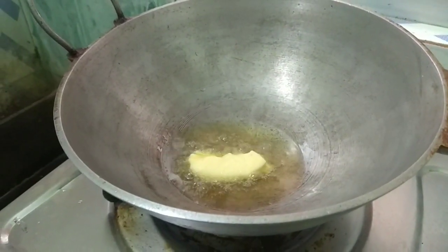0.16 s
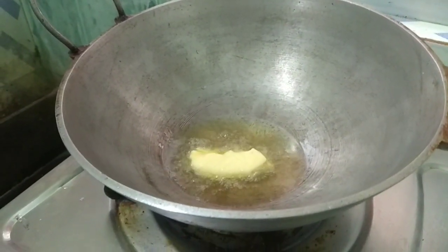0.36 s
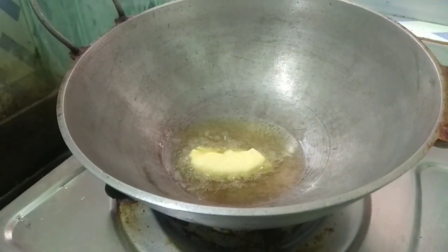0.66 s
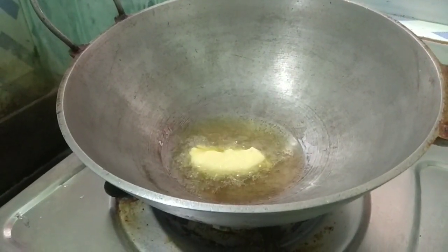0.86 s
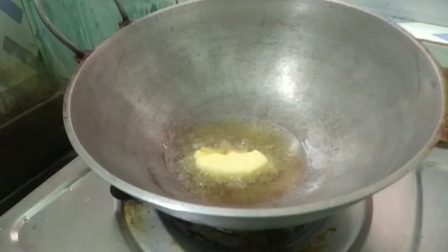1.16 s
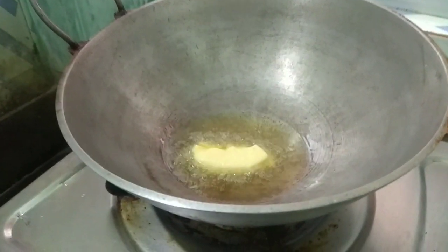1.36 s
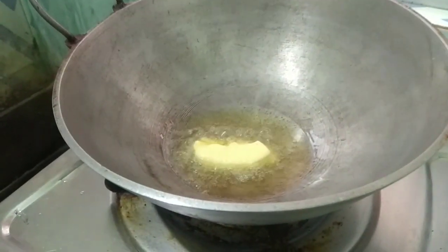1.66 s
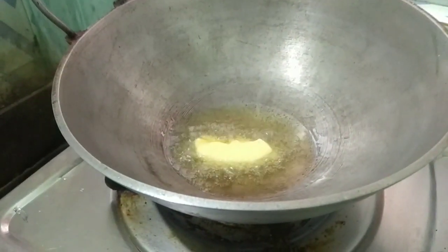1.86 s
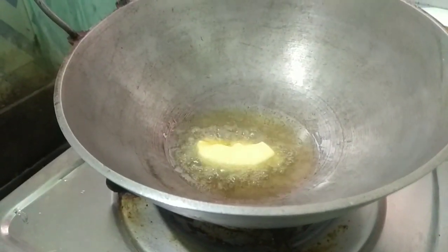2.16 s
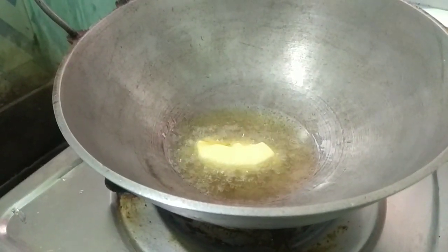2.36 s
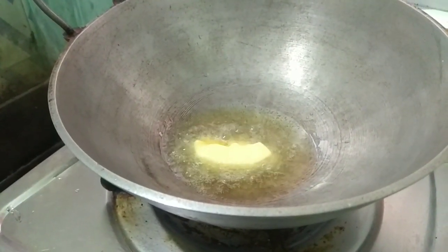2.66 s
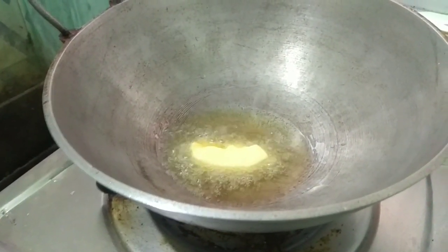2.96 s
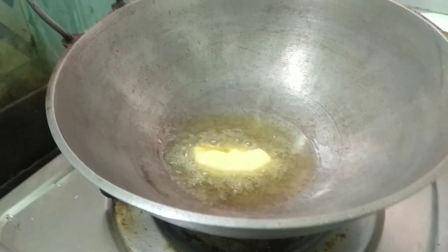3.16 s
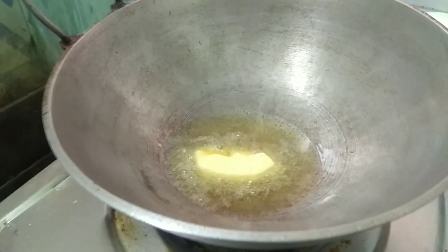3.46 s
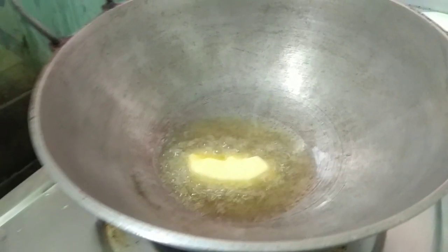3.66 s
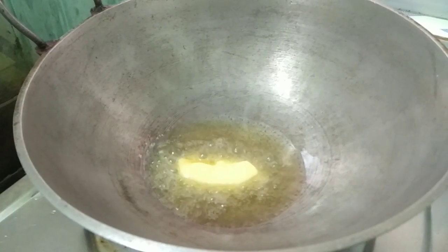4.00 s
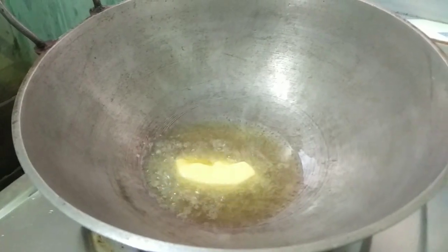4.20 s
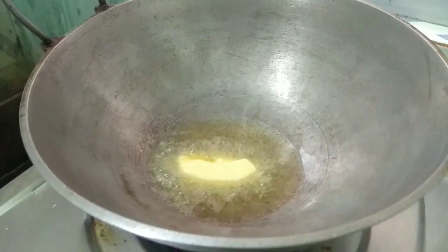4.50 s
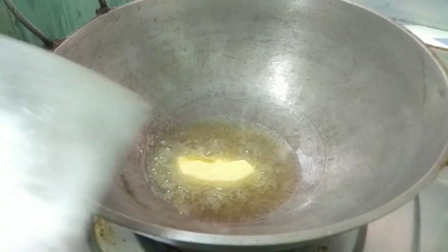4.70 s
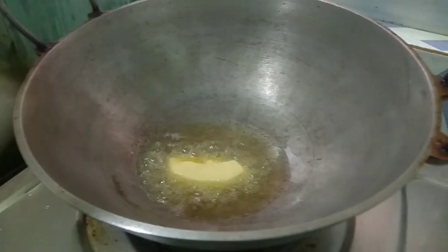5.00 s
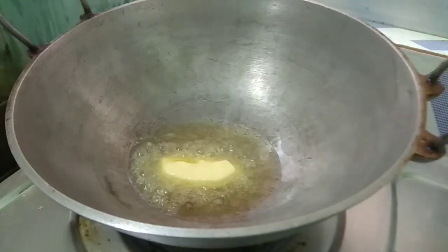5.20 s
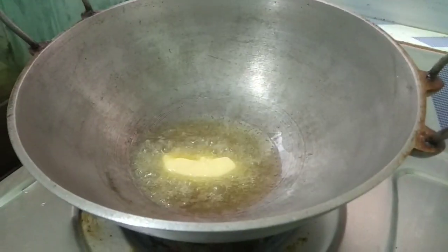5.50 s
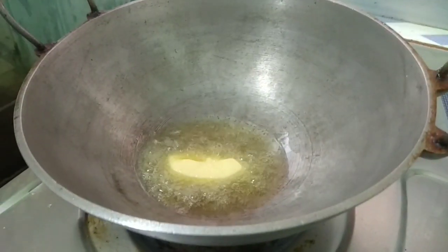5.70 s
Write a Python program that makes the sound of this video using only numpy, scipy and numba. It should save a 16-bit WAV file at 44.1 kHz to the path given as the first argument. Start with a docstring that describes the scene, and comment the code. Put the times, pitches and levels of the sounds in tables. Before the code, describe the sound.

Butter frying in hot oil in a thin metal wok on a stove. Sharp steam pops with short sprays of spatter come thick and loud in the first second and a half, then thin out. Foamy sizzling rushes surge in the middle, followed by a lighter simmer with scattered snaps. Close handheld phone microphone, narrow band, with very faint room hiss.

```python
"""Butter melts in hot oil in a metal wok: steam pops crack at a bubble's pitch and spit a patter of spray.
Random clicks through resonant bands make the sizzle of large and small bubbles and the foam's soft rushes.
Bright snaps, rough squeals and soft narrow noise swells join in; the bowl rings at its modes over faint
kitchen hiss. A tone colour, a phone's noise suppressor and its narrow band shape the whole."""
import sys
import numpy as np
from scipy import signal
from scipy.fft import rfft, irfft
from scipy.io import wavfile
from scipy.ndimage import uniform_filter1d
from numba import njit

SR = 44100
rng = np.random.default_rng(int(sys.argv[2]) if len(sys.argv) > 2 else 0)


def persist_wave(psi):
    """Save psi, clipped to +-1, as 16-bit WAV."""
    counts = np.round(np.clip(psi, -1, 1) * 32767).astype(np.int16)
    wavfile.write(sys.argv[1], SR, np.atleast_2d(counts).T)


N = 257832  # length in samples


def undb(db):
    """Gain of a level in dB."""
    return 10 ** (np.asarray(db) / 20)


def unit(x):
    """Scale to rms 1."""
    return x / np.sqrt(np.mean(x ** 2))


@njit
def sweep(x, g, k):
    """State-variable band-pass, gain 1 at the centre; g sets the centre and k the relative width."""
    y, band, low = np.empty(len(x)), 0., 0.
    for i in range(len(x)):
        v = (band + g[i] * (x[i] - low)) / (1 + g[i] * (g[i] + k[i]))
        band = 2 * v - band
        low = low + 2 * g[i] * v
        y[i] = k[i] * v
    return y


def svf(x, hz, width):
    """Band-pass at a fixed or moving centre; equal first and last centres count as fixed."""
    hz = hz + np.zeros(len(x))
    if hz[0] == hz[-1]:
        g = np.full(len(x), np.tan(np.pi * hz[0] / SR))
    else:
        g = np.tan(np.pi * hz / SR)
    return sweep(1. * x, g, width / hz)


def ring(x, hz, width):
    """A steep resonance: the band-pass twice."""
    width = np.maximum(width, 20.)
    return svf(svf(x, hz, width), hz, width)


def colour(x, points):
    """Shape a spectrum by (Hz, dB) points, joined along log frequency."""
    hz, db = np.transpose(points)
    f = np.maximum(np.arange(N // 2 + 1) * SR / N, 1)
    gain = undb(np.interp(np.log(f), np.log(hz), db))
    return irfft(rfft(x) * gain, N)


def walk(rate):
    """Random levels held 1 / rate s and slewed twice; rms 1."""
    k = int(SR / rate)
    steps = np.repeat(rng.standard_normal(N // k + 1), k)
    return unit(uniform_filter1d(uniform_filter1d(steps, k), k)[:N])


def crackle(rate, spread_db, hiss_db):
    """Bursting bubbles: random clicks (rate per second), some larger than the rest, over hiss."""
    when, sign, size = rng.random(N), rng.random(N), rng.exponential(1, N)
    size = np.minimum(size, 3.5)
    clicks = (when < rate / SR) * np.sign(sign - .5) * undb(spread_db * size)
    return unit(unit(clicks) + undb(hiss_db) * rng.standard_normal(N))


# Steam pops. Each row: start in seconds, crack level in dB, pitch in Hz,
# spray decay by 60 dB in seconds, spray level in dB against the crack.
STEAM_POPS = [(0.06, -20, 3500, 0.36, -10), (0.0685, -14.5, 3275, 0.25, -10), (0.147, -26, 5850, 0.22, -10),
              (0.173, -9, 5960, 0.21, -9), (0.1861, -16, 4080, 0.21, -3.5), (0.268, -33, 6090, 0.94, -2),
              (0.25, -37, 3260, 0.52, 1.5), (0.3207, -25, 3350, 0.14, -6.5), (0.333, -20, 3940, 0.24, -8.5),
              (0.361, -3.5, 6090, 0.2, -13), (0.3643, -15, 3940, 0.16, -11), (0.4856, -14.5, 4170, .15, -7),
              (0.4876, -12.5, 5790, 0.27, -12), (0.515, -20, 5280, 0.22, -0.5),
              (0.6477, -28, 3380, 0.17, -8), (0.701, -36.5, 5990, 0.33, -6.5),
              (0.746, -20.5, 4280, 0.53, -7), (0.7841, -20.5, 3750, 0.24, -5),
              (0.8096, -11.5, 5860, 0.14, -9), (0.82, -17, 5900, 0.2, -6), (0.9562, -20, 5870, 0.32, -5),
              (0.96, -30.5, 3350, 0.49, -3.5), (1.0208, -28.5, 6140, 0.18, -6),
              (1.0555, -26, 5950, .09, -12), (1.0649, -28.5, 5900, .1, -9), (1.16, -44.5, 3030, .2, -0.5),
              (1.2138, -22.5, 3790, 0.42, -8), (1.2249, -19, 5800, 0.21, -13),
              (1.288, -28, 3425, 0.27, -12), (1.3925, -20, 2860, 0.23, -4.5), (1.4, -18.5, 3770, .12, -10),
              (1.45, -9.5, 3870, 0.079, -14), (1.458, -19.5, 3890, .17, -1.5),
              (1.538, -22, 5870, 0.14, -7.5), (1.6239, -31, 5810, 0.43, -9), (1.6372, -20, 4255, 0.3, -8.5),
              (1.677, -22, 3870, 0.067, -14), (1.6824, -26, 3240, 0.25, -4.5),
              (1.7217, -29.5, 5990, 0.12, -2.5), (1.8716, -29.5, 6290, 0.28, -7),
              (2.063, -27.5, 5800, .3, -7.5), (2.063, -30, 3710, .3, -7), (2.149, -22, 5730, 0.2, -14.5),
              (2.168, -34, 3130, 0.18, -6), (2.2415, -20.5, 5850, 0.24, -15.5),
              (2.3146, -26, 6040, 0.22, -8), (2.4069, -24, 4180, 0.3, -9.5), (2.451, -21, 6110, 0.26, -7.5),
              (2.7165, -31, 5220, 0.15, -5), (2.79, -36, 2400, 0.28, -2.5), (2.802, -28.5, 6340, 0.36, -5),
              (2.8631, -30.5, 3520, .31, -5.5), (2.8907, -21.5, 3344, 0.25, -3.5),
              (2.925, -16.5, 3164, 0.32, -11), (3.019, -31, 3570, 0.21, -4.5),
              (3.1094, -39, 6050, 0.47, -8.5), (3.2436, -21.5, 6320, 0.53, -10),
              (3.2971, -15, 6520, 0.14, -11), (3.374, -29, 5500, 0.39, -6), (3.4436, -35.5, 3995, 0.31, 0),
              (3.714, -38, 3150, 0.5, -1.5), (3.874, -35, 3630, .59, -6), (3.9696, -29.5, 6130, 0.09, -4),
              (4.002, -15.5, 6390, 0.19, -7.5), (4.1815, -27.5, 5490, 0.13, -9),
              (4.179, -32.5, 3440, 0.14, -3.5), (4.2636, -38.5, 3170, 0.28, -3),
              (4.2832, -27.5, 2933, 0.12, -9), (4.3589, -28.5, 5430, 0.28, -10),
              (5.018, -26, 3760, 0.13, -14), (5.032, -27.5, 3640, 0.097, -11.5),
              (5.1798, -33.5, 5900, 0.47, -6), (5.213, -31.5, 6570, 0.14, -5),
              (5.376, -30.5, 4990, 0.2, -8), (5.4408, -28.5, 3765, 0.22, -7.5),
              (5.458, -24.5, 6170, 0.28, -7.5), (5.4799, -12, 5340, .05, -20), (5.487, -25, 5130, .3, -4),
              (5.5755, -29.5, 5990, 0.063, -4.5), (5.697, -28.5, 6040, .24, -6),
              (5.767, -37, 3030, 0.24, 1), (5.7834, -17, 3000, .25, -13.5)]
WOK_LOW_HZ, WOK_HIGH_HZ, SPRAY_WIDTH_HZ = 3870, 5900, 1400
OTHER_LOW_DB, OTHER_HIGH_DB = -11.5, -15.5  # the wok's other ringing band: under a high pop, under a low pop
THUMP_HZ, THUMP_WIDTH_HZ = 900, 3200  # dull push under a crack
THUMP_DB, THUMP_GROWTH = -25.5, 2.9  # offset in dB; dB gained per dB of crack


def pops():
    """Water flashes to steam: a crack at the bubble's pitch, then droplets that patter back and die away."""
    out, low, t = np.zeros(N + SR), np.zeros(N + SR), np.arange(SR // 3) / SR
    thump = ring(np.exp(-t / 0.00097), THUMP_HZ, THUMP_WIDTH_HZ)
    thump = thump / np.abs(thump).max()
    spray = crackle(rate=1100, spread_db=1.2, hiss_db=-9)
    starts = rng.integers(0, N - len(t), len(STEAM_POPS))
    for (s, db, hz, t60, spray_db), a in zip(STEAM_POPS, starts):
        crack = np.sin(2 * np.pi * hz * t) * (t / 0.0011) * np.exp(1 - t / 0.00077)
        crack[:4] += 1.2 * np.array([1, -1, -1, 1])  # the film snaps
        if hz > 4700:
            other_hz, other_db = WOK_LOW_HZ, OTHER_LOW_DB
        else:
            other_hz, other_db = WOK_HIGH_HZ, OTHER_HIGH_DB
        drops = spray[a:a + len(t)]
        patter = unit(ring(drops, hz, SPRAY_WIDTH_HZ))
        patter = patter + undb(other_db) * unit(ring(drops, other_hz, SPRAY_WIDTH_HZ))
        onset = (1 - np.exp(-t / 0.0023)) ** 2
        patter = patter * onset * undb(spray_db - 60 * t / max(t60, .03))
        i = int(s * SR)
        out[i:i + len(t)] += undb(db) * (crack + patter)
        low[i:i + len(t)] += undb(THUMP_GROWTH * db + THUMP_DB) * thump
    return out[:N], low[:N]


# Lone droplets that snap without a spray. Each row: start in seconds, peak level in dB.
DROPLET_SNAPS = [(0.1763, -17), (0.1768, -13.5), (0.366, -11.5), (0.3685, -13.5), (1.8827, -26),
                 (1.9161, -33), (2.0626, -25), (2.9303, -21), (3.383, -30.5), (3.452, -30), (4.056, -26),
                 (4.4015, -25.5), (4.861, -32), (5.032, -22.5), (5.0458, -29.5), (5.1751, -25),
                 (5.215, -24.5), (5.24, -22.5), (5.185, -29.5), (5.3128, -35), (5.376, -22),
                 (5.4437, -25.5)]
TICK_HZ, TICK_WIDTH_HZ = 5600, 4200  # band of a snap
PATTER_DB = -5.5  # scattered snaps against the small bubbles' gain


def ticks(gain):
    """Short bright snaps: the loud ones from the table, the faint ones scattered with the boiling."""
    snap = ring(np.arange(200) == 0., TICK_HZ, TICK_WIDTH_HZ)
    clicks = np.zeros(N)
    for s, db in DROPLET_SNAPS:
        clicks[int(s * SR)] = undb(db)
    loud = np.convolve(clicks, snap)[:N] / np.abs(snap).max()
    scattered = unit(np.convolve(crackle(rate=300, spread_db=3.0, hiss_db=-30), snap)[:N])
    return loud + undb(PATTER_DB) * gain * scattered


FLICKER_DB = 1.5  # rms level flicker of a bubble size
WANDER = .12  # rms pitch drift of a bubble size, share of its width


def bubbles(sizes, rate, spread_db, hiss_db):
    """Each bubble size crackles on its own, flickers in level and wanders in pitch; one row per size."""
    rows = []
    for hz, width, db in sizes:
        flicker = undb(db + FLICKER_DB * walk(26.04))
        pitch = hz + WANDER * width * walk(20)
        rows.append(flicker * unit(ring(crackle(rate, spread_db, hiss_db), pitch, width)))
    rows = np.array(rows)
    return rows / np.sqrt(np.mean(rows.sum(axis=0) ** 2))


# Surges of boiling. Each row: top in seconds, fall by 20 dB in seconds (0.02 at least),
# then the levels in dB of large bubbles, small bubbles and foam rush.
BOILING_SURGES = [(0.194, 0.09, -38.5, -38, -51.5), (0.545, 0.34, -46.5, -44.5, -52),
                  (1.47, 0.1637, -35.5, -38.5, -61.5), (1.69, 0.08, -37.5, -51.5, -55.5),
                  (1.968, 0.13, -39.5, -49, -56), (2.12, 0.0818, -36.5, -35, -38),
                  (2.189, 0.0842, -35, -37, -49.5), (2.5, 0.0856, -32.5, -31.5, -33),
                  (2.82, 0.2, -51.5, -46, -50), (2.905, 0.0843, -32, -30, -30.5),
                  (3.16, 0.4, -49.5, -55.5, -60.5), (3.229, 0.16, -45, -41, -51),
                  (3.296, 0.0783, -38, -33.5, -36.5), (3.589, 0.13, -55, -47, -54),
                  (3.755, 0.12, -46, -48.5, -51), (4.039, 0.13, -41, -40.5, -46), (4.3, 0.5, -49, -59, -73),
                  (4.43, 1.16, -62.5, -49.5, -71.5), (4.56, -0.04, -45.5, -49.5, -74.5),
                  (4.818, 0.06, -43, -51.5, -58), (4.92, 0.5, -48.5, -56.5, -62.5),
                  (5.056, 0.05, -40.5, -41, -58), (5.292, 0.3, -46.5, -52, -64),
                  (5.421, 0.23, -39.5, -42.5, -61.5), (5.55, 0.7, -49, -48, -59.5),
                  (5.72, -0.13, -52.5, -47.5, -66.5)]
SURGE_RISE, SURGE_SHAPE = 0.9, 1.555  # rise time against fall time; power of the fall in dB (flat top, steep flanks)


def boiling(column, simmer_db, stretch=1):
    """Gain of one bubble layer: the simmer, and surges that swell, hold briefly and fade, summed in power."""
    t = np.arange(N) / SR
    coarse = t[::32]
    power = undb(np.broadcast_to(simmer_db, N)[::32]) ** 2
    for row in BOILING_SURGES:
        since = (coarse - row[0]) / max(row[1], .02) / stretch
        drop_db = 20 * np.maximum(since, -since / SURGE_RISE) ** SURGE_SHAPE
        power = power + undb(row[column] - drop_db) ** 2
    return np.interp(t, coarse, np.sqrt(power))


# Bubble sizes of the sizzle and the foam. Each row: pitch in Hz, filter width in Hz, relative level in dB.
LARGE_BUBBLES = [(2276, 440, -2), (2845, 360, -2), (3550, 1380, 8)]
SMALL_BUBBLES = [(4476, 260, -9), (5695, 2350, 1.5), (6810, 190, -7)]
FOAM_BUBBLES = [(755, 49, -11.5), (1130, 880, 0), (1610, 720, 3.5), (2400, 1730, 6.5)]
# Simmer between the surges. Each row: time in seconds, large bubbles in dB, small bubbles in dB.
SIMMER_LEVELS = [(0, -48.5, -55.5), (.04, -54, -58), (.7, -47.5, -51), (1.14, -61, -69.5),
                 (1.2, -51.5, -67), (1.36, -52, -67.5), (1.6, -56.5, -51), (1.81, -63, -66.5),
                 (1.86, -65, -64), (1.89, -61.5, -48.5), (2.38, -47.5, -50.5), (2.72, -45.5, -49.5),
                 (3.095, -54.5, -62), (3.5, -43.5, -51), (3.66, -50, -55.5), (3.9, -51, -51),
                 (4.6, -49.5, -53.5), (4.72, -49, -60), (5.12, -52.5, -50), (5.85, -49, -57.5)]
SIMMER_FOAM_DB = -70.5
FOAM_NARROW = .3  # low foam comes and goes faster than high: power of pitch in its surge length
SIZZLE_LOW_HZ = 2400  # steep lower edge of the sizzle and pops


def frying():
    """The sizzle of large and small bubbles with the pops, and under it the surging foam."""
    cracks, thumps = pops()
    s, large_db, small_db = np.transpose(SIMMER_LEVELS)
    t = np.arange(N) / SR
    large = boiling(column=2, simmer_db=np.interp(t, s, large_db))
    small = boiling(column=3, simmer_db=np.interp(t, s, small_db))
    sizzle = large * bubbles(LARGE_BUBBLES, rate=1200, spread_db=1.5, hiss_db=-6.0).sum(axis=0)
    sizzle = sizzle + small * bubbles(SMALL_BUBBLES, rate=1100, spread_db=3.5, hiss_db=-6).sum(axis=0)
    sizzle = sizzle + ticks(small) + cracks
    edge = signal.butter(N=6, Wn=SIZZLE_LOW_HZ, btype="high", fs=SR, output="sos")
    foam = np.zeros(N)
    rows = bubbles(FOAM_BUBBLES, rate=600, spread_db=1.0, hiss_db=-12.5)
    for (hz, _, _), row in zip(FOAM_BUBBLES, rows):
        stretch = (hz / FOAM_BUBBLES[-1][0]) ** FOAM_NARROW
        foam += boiling(column=4, simmer_db=SIMMER_FOAM_DB, stretch=stretch) * row
    return signal.sosfilt(edge, sizzle) + foam + thumps


# Ringing of the bowl. Each row: mode in Hz, level in dB before wok() compresses the differences.
WOK_MODES = [(1308, -55.5), (1766, -45.5), (2028, -55), (2460, -65), (3402, -66.5), (3768, -48),
             (4086, -68), (4285, -65.5), (5534, -58), (6045, -49), (6422, -64), (6708, -45)]


def wok(x, width_hz, ring_db):
    """The thin bowl rings along at its modes, the strongest at ring_db."""
    top_db = max(db for _, db in WOK_MODES)
    ringing = sum(undb(ring_db + 0.42 * (db - top_db)) * svf(x, float(hz), width_hz) for hz, db in WOK_MODES)
    return x + ringing


def flutter(x):
    """A faint low flutter: a wavering noise band that rises with the frying."""
    effort = np.sqrt(uniform_filter1d(x ** 2, int(0.017 * SR)) + 1e-12)
    waver = undb(3.0 * walk(12))
    rumble = ring(rng.standard_normal(N), 210.0, 890.0)
    return undb(-70.0) * unit(effort ** 0.56 * rumble * waver)


# Squeals of steam forced through the fat, one curve each. Each row: time in seconds, pitch in Hz, level in dB.
SQUEAL_CURVES = [
    [(0.41, 1797, -63), (0.46, 1880, -53), (0.53, 1974, -50.5), (0.585, 1884, -48.5), (0.65, 1793, -50.5),
     (0.72, 1800, -64.5)],
    [(0.535, 2610, -56), (0.555, 2400, -45), (0.58, 2230, -51.5)],
    [(3.97, 1730, -58), (3.99, 1804, -49.5), (4.075, 1940, -42), (4.16, 1880, -47), (4.25, 1700, -60.5)],
]
# Filter width of each squeal, in Hz.
SQUEAL_BANDS = [220, 240, 560]


def squeals():
    """Steam forced through the fat: a narrow rough band that bends in pitch."""
    out, t, air = np.zeros(N), np.arange(N) / SR, crackle(rate=600, spread_db=1.0, hiss_db=4.0)
    for curve, width in zip(SQUEAL_CURVES, SQUEAL_BANDS):
        s, hz, db = np.transpose(curve)
        near = slice(int(s[0] * SR), int(s[-1] * SR))
        tone = unit(ring(air[near], np.interp(t[near], s, hz), width))
        level = undb(np.interp(t[near], s, db))
        out[near] += tone * level * signal.windows.tukey(len(tone), .2)
    return out


# Soft narrow noise swells, from low to high pitch.
# Each row: top in seconds, pitch in Hz, length in seconds, level in dB.
NOISE_SWELLS = [(0.171, 372, 0.13, -63), (0.238, 956, 0.099, -57), (0.563, 573, 0.11, -57),
                (1.243, 648, .067, -59), (1.462, 2515, 0.14, -39.5), (1.487, 1160, 0.17, -63.5),
                (1.672, 742, 0.082, -59), (1.961, 474, 0.099, -58.5), (1.345, 2796, .05, -40.5),
                (2.075, 1606, .05, -50.5), (2.636, 2950, .05, -42), (3.312, 1016, .07, -48.5),
                (2.82, 2163, 0.065, -45), (3.136, 2035, 0.045, -50.5), (2.916, 454, .15, -51),
                (3.238, 367, 0.34, -64), (3.586, 1706, 0.056, -59.5), (4.03, 466, 0.06, -53.5),
                (4.08, 967, 0.07, -56.5), (4.79, 900, 0.12, -64), (4.82, 3700, .07, -42.5),
                (4.92, 2793, .05, -48.5), (5.062, 571, 0.051, -58.5)]


def noise_swells():
    """Soft narrow bands of rough noise, from low to high pitch; each swells and fades."""
    out, t, air = np.zeros(N), np.arange(N) / SR, crackle(rate=360, spread_db=0.5, hiss_db=9.0)
    for s, hz, length, db in NOISE_SWELLS:
        near = slice(max(int((s - 2 * length) * SR), 0), int((s + 2 * length) * SR))
        tone = unit(ring(air[near], hz, hz / 7))
        swell = np.exp(-(2 * (t[near] - s) / length) ** 2)
        out[near] += undb(db) * tone * swell
    return out


# Colour of the room hiss. Each row: frequency in Hz, relative gain in dB.
KITCHEN_COLOUR = [(25, -32), (49, -36.5), (118, -14.5), (225, -13.5), (479, -7), (1760, -12.5), (2230, -4),
                  (2600, -10), (3380, -24), (5720, -120)]
KITCHEN_DB = -60


def kitchen():
    """Faint room hiss; octave bands of noise waver apart."""
    bands = np.zeros(N)
    for hz in 47.0 * 2 ** np.arange(8):
        bands += undb(1.5 * walk(10)) * svf(rng.standard_normal(N), hz, 0.84 * hz)
    return undb(KITCHEN_DB) * unit(colour(bands, KITCHEN_COLOUR))


def scene():
    """Everything in and around the wok."""
    oil = wok(frying(), width_hz=16., ring_db=-2.0)
    return (oil + flutter(oil) + noise_swells() + squeals() + kitchen())[None]


def suppress(x, margin_db, depth_db, hold):
    """The phone's noise suppressor: each bin is turned down as it nears its usual quiet level."""
    _, _, z = signal.stft(x, nperseg=1024)
    power = signal.lfilter([1 - hold], [1, -hold], np.abs(z) ** 2, axis=1) + 1e-20
    quiet = uniform_filter1d(np.percentile(power, 30, axis=1), size=9)[:, None]
    quiet = quiet * undb(2 * margin_db)
    gain = np.maximum(power / (power + quiet), undb(-abs(depth_db)))
    return signal.istft(z * gain, nperseg=1024)[1][:N]


# Overall tone colour: a small step down near 4 kHz and a falling top. Each row: frequency in Hz, gain in dB.
TONE_COLOUR = [(300, -1), (3850, 3), (4020, -3), (4300, 0.5), (6600, 0), (7300, -5.5), (7800, -23)]
TOP_HZ = 7700  # upper edge of the phone's band


def record(dry):
    """The overall tone colour, then the phone's noise suppressor and its narrow band."""
    clean = suppress(colour(dry[0], TONE_COLOUR), margin_db=2.0, depth_db=11.0, hold=.5)
    band = signal.ellip(10, .2, 80, TOP_HZ, fs=SR, output="sos")
    return signal.sosfilt(band, clean)[None]


dry = scene()
out = record(dry)
persist_wave(out)
```